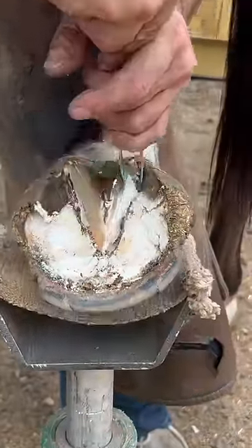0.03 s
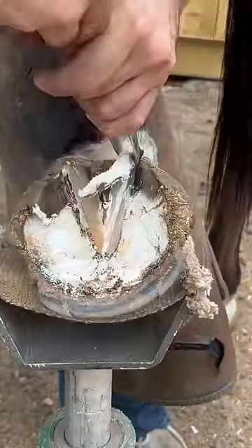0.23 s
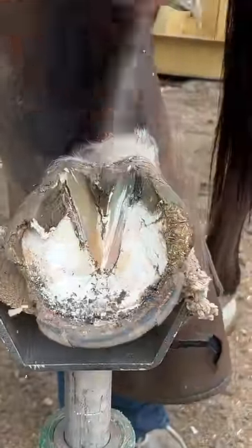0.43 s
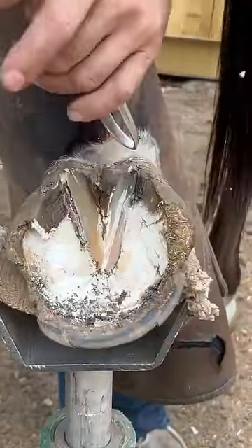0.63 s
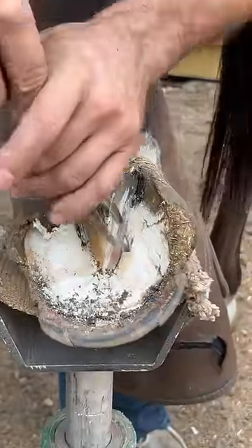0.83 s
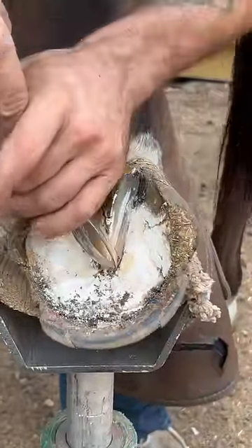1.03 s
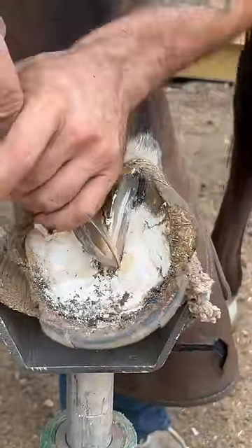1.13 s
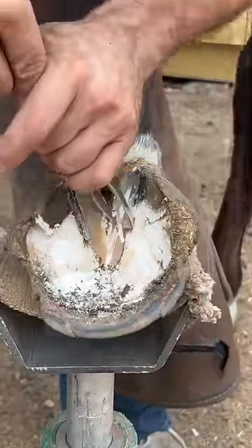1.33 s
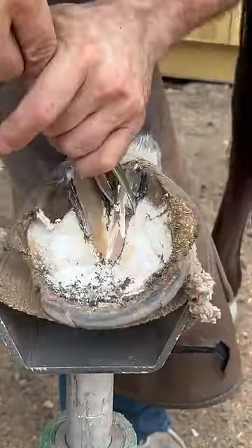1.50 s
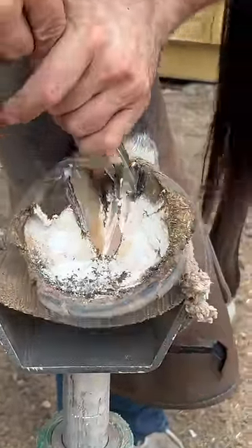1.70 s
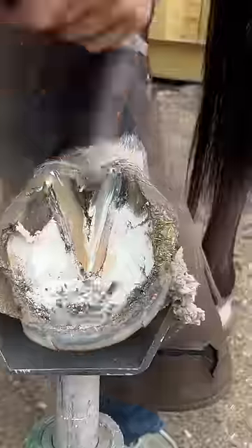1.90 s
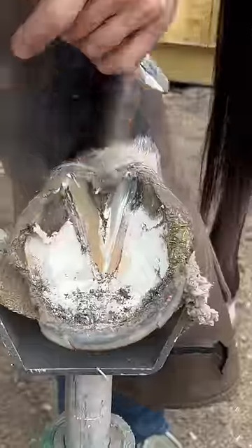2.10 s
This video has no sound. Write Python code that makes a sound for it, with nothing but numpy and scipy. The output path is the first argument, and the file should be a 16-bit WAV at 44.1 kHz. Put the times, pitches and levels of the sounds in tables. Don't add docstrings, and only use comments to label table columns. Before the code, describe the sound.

Hoof trimming up close: blade snaps through horn twice, with light scraping between over quiet outdoor hiss

```python
import sys
import numpy as np
from scipy import signal
from scipy.fft import rfft, irfft, next_fast_len
from scipy.io import wavfile
from scipy.ndimage import uniform_filter1d, map_coordinates

SR = 44100
rng = np.random.default_rng(int(sys.argv[2]) if len(sys.argv) > 2 else 0)


def voltage_ratio(level):
    return 10 ** (np.asarray(level, float) / 20)


def master_out(mix):
    frames = np.transpose(np.atleast_2d(mix))
    ceiling = np.clip(frames, -1, 1)
    pcm = np.round(ceiling * 32767).astype(np.int16)
    wavfile.write(sys.argv[1], SR, pcm)


N = 94815


def unit(x):
    return x / np.sqrt(np.mean(x ** 2) + 1e-20)


def along(points, hz):
    point_hz, value = np.transpose(points)
    return np.interp(np.log(hz + 1), np.log(point_hz + 1), value)


def wobble(rate_hz):
    values = rng.standard_normal(int(N * rate_hz / SR) + 4)
    return map_coordinates(values, [np.arange(N) * rate_hz / SR])


def filtered(x, response):
    size = next_fast_len(N + SR // 2)
    return irfft(rfft(x, size) * response(np.fft.rfftfreq(size, 1 / SR)), size)[..., :N]


def body(peaks):
    def response(f):
        total = 0
        for k, (hz, width_hz, level_db) in enumerate(peaks):
            damping = 1j * f * width_hz
            total = total + (-1) ** k * voltage_ratio(level_db) * damping / (hz * hz - f * f + damping)
        return total
    return response


# hz, likeness (1 = identical channels)
COHERENCE = [(60, 0.89), (240, 0.84), (950, 0.98), (3770, 0.019), (15000, 0.1)]


def rush(spectrum, patchy_db):
    z = signal.stft(rng.standard_normal((2, N)), nperseg=512)[2]
    patches = uniform_filter1d(rng.standard_normal(z.shape[1:]), 6, 0)
    patches = uniform_filter1d(patches, 10, 1)
    pair = signal.istft(z * voltage_ratio(patchy_db * unit(patches)), nperseg=512)[1][:, :N]

    def mid_side(hz):
        angle = np.arccos(np.clip(along(COHERENCE, hz), -1, 1)) / 2
        return voltage_ratio(along(spectrum, hz)) * [np.cos(angle), np.sin(angle)]

    mid, side = filtered(pair, mid_side)
    return unit(np.array([mid + side, mid - side]))


# hz, level_db, t60_s
BLADE_MODES = [(2900, -13.5, 0.019), (3436, 4.5, 0.013), (3545, -22, 0.029), (8300, -18.5, 0.013)]


def blade_ring(level_db, t):
    rise_s = .00075
    swell = (1 - np.exp(-t / rise_s)) ** 3 * 1.8
    ring = np.zeros((2, len(t)))
    for hz, mode_db, t60_s in BLADE_MODES:
        phase = 2 * np.pi * hz * t + rng.uniform(0, 7.1) + np.array([[.6], [-.6]])
        ring += voltage_ratio(level_db + mode_db - 60 * t / t60_s) * swell * np.sin(phase)
    return ring


# start_s, peak_db, crack_t60_s, ring_over_crack_db, treble_over_crack_db
SNAPS = [
    (.2461, -17, 0.03, 3.5, 7.5),
    (1.8394, -22, 0.01295, -16, 8),
    (1.8410, -29.5, 0.021, -11.5, 13),
    (1.8497, -40, .012, -16, 17),
]
# hz, width_hz, level_db
CHIP_MODES = [(250, 57, -7.5), (420, 80, -1), (626, 84, 7.5), (930, 270, 4), (1530, 220, 2.5),
              (2128, 410, -5), (4850, 1500, -2.5)]
# hz, width_hz, level_db
SLAB_MODES = [(227.2, 83, 9), (436, 122, 2.5), (600, 164, 2), (990, 340, -2.5), (1620, 660, -7.5),
              (2330, 370, -3), (3190, 560, -2), (4670, 970, -8)]
# hz, width_hz, level_db
CHIP_EDGE_MODES = [(6210, 1200, -7), (8300, 890, 4), (8850, 540, 2), (12000, 450, -5.5), (14860, 1300, -7)]
# hz, width_hz, level_db
SLAB_EDGE_MODES = [(5880, 330, 3), (7830, 820, -3.5), (9600, 1100, -5), (12000, 1160, 3.5),
                   (14600, 2200, 2)]
# hz, width_hz, level_db
SPLINTER_MODES = [(7400, 1500, -5), (12000, 1300, 2.5), (15500, 700, 2.5)]
# hz, left_lead_rad
EDGE_PHASE = [(4000, 2.9), (8000, 1.3), (13000, 2.9)]


def snaps():
    tear_s, rise_s, edge_t60_s = .0015, .0003, .006
    fibre_s, fibre_share = .0007, .35
    fray_db, blow_db, nick_db = -3, 25.5, 7.5
    horn_drive, ring = np.zeros((2, N + SR)), np.zeros((2, N + SR))
    edge_drive = np.zeros((3, 2, N + SR))
    t = np.arange(SR // 4) / SR
    for k, (start_s, peak_db, t60_s, ring_db, treble_db) in enumerate(SNAPS):
        i = round(start_s * SR)
        span = slice(i, i + len(t))
        noise = rng.standard_normal((3, len(t)))
        tear = voltage_ratio(-60 * np.maximum(t - tear_s, 0) / t60_s) * (1 - np.exp(-t / rise_s))
        horn = horn_drive[min(k, 1)]
        horn[span] += voltage_ratio(peak_db + fray_db) * tear * noise[0]
        horn[[i + 9, i + round(fibre_s * SR)]] += voltage_ratio(peak_db + blow_db) * np.array([1, fibre_share])
        burst = voltage_ratio(-60 * np.abs(t - rise_s) / edge_t60_s) + .1 * tear
        edge = edge_drive[(0, 1, 1, 2)[k]]
        edge[:, span] += voltage_ratio(peak_db + treble_db) * burst * (0.9 * noise[1] + 0.2 * noise[[0, 2]])
        edge[:, i + round(rise_s * SR)] += voltage_ratio(peak_db + treble_db + nick_db)
        ring[:, span] += blade_ring(peak_db + ring_db, t)
    horn = filtered(horn_drive[0, :N], body(CHIP_MODES)) + filtered(horn_drive[1, :N], body(SLAB_MODES))
    left_late_s = .00006
    horn = filtered(horn, lambda f: np.exp(-2j * np.pi * f * np.array([[left_late_s], [0]])))
    edge_modes = (CHIP_EDGE_MODES, SLAB_EDGE_MODES, SPLINTER_MODES)
    edge = sum(filtered(drive[:, :N], body(modes)) for drive, modes in zip(edge_drive, edge_modes))
    edge = filtered(edge, lambda f: np.exp(.5j * along(EDGE_PHASE, f) * np.array([[1], [-1]])))
    pan_db = 2
    return (horn + ring[:, :N]) * voltage_ratio([[pan_db], [-pan_db]]) + edge


# start_s, length_s, level_db, brightness_db
STROKES = [(-.12, 0.36, -64, -10.5), (0.055, 0.27, -80, 4), (0.156, 0.1, -65.5, -12),
           (1.136, 0.058, -67, -10), (1.256, 0.059, -58, 0), (1.296, 0.057, -69, -8.5),
           (1.401, 0.23, -71.5, -12.5), (1.549, .24, -68, -6.5), (1.747, 0.077, -64, -1.5),
           (1.805, 0.083, -64.5, -14), (0.509, 0.23, -73.5, -18), (1.157, 0.12, -74.5, -10.5)]
# start_s, level_db, t60_s, brightness_db
CRUMBS = [
    (.252, -57, .36, -3.5),
    (1.845, -53, 0.271, -7),
]
# hz, density_db (per Hz)
DULL_RUB = [(180, -31.5), (300, -1), (1620, -5), (2340, -3), (4650, -7.5), (5820, -16), (7000, -17.5),
            (9100, -47.5), (15400, -120)]
# hz, density_db (per Hz)
BRIGHT_RUB = [(4000, -31.5), (5500, -15.5), (8500, -0.5), (12300, -11), (14000, -4.5), (16000, -12.5),
              (17000, -14.5)]


def scrapes():
    t = np.arange(N) / SR
    start_s, length_s, level_db, stroke_bright_db = np.transpose(STROKES)[..., None]
    strokes = voltage_ratio(level_db) * np.sin(np.pi * np.clip((t - start_s) / length_s, 0, 1)) ** 2
    start_s, level_db, t60_s, dust_bright_db = np.transpose(CRUMBS)[..., None]
    dust = (t > start_s) * voltage_ratio(level_db - 60 * np.abs(t - start_s) / t60_s)
    envelopes = np.vstack([strokes, dust])
    bright_db = np.vstack([stroke_bright_db, dust_bright_db])

    grains_per_s, grain_spread_db, grain_share, wobble_db = 5700, 4.5, 0.29, 1.5
    struck = rng.random((2, N)) < grains_per_s / SR
    size = voltage_ratio(grain_spread_db * np.minimum(rng.standard_exponential(N), 3))
    grains = struck * size * rng.standard_normal((2, N))
    rub = grain_share * unit(grains) + (1 - grain_share) * rng.standard_normal((2, N))
    rub = rub * voltage_ratio(wobble_db * wobble(120))
    rub = rub + 0.2 * rub[::-1]

    def coloured(spectrum):
        return unit(filtered(rub, lambda f: voltage_ratio(along([(100, -45.5)] + spectrum, f))))

    dull = coloured(DULL_RUB) * envelopes.sum(0)
    bright = coloured(BRIGHT_RUB) * (envelopes * voltage_ratio(bright_db)).sum(0)
    return (dull + bright) * voltage_ratio([[1.2], [-1.2]])


# from_hz, to_hz, level_db, width_hz
SQUEAKS = [
    (13860, 11908, -70, 250),
    (2850, 2600, -66.5, 700),
    (12200, 7500, -74, 220),
]
# start_s, end_s
SQUEAK_SPAN = (-.01, .135)


def squeaks():
    start_s, end_s = SQUEAK_SPAN
    progress = np.clip((np.arange(N) / SR - start_s) / (end_s - start_s), 0, 1)
    out = np.zeros(N)
    for from_hz, to_hz, level_db, width_hz in SQUEAKS:
        phase = 2 * np.pi * np.cumsum(from_hz + (to_hz - from_hz) * progress) / SR
        out += voltage_ratio(level_db) * np.sin(np.pi * progress) * wobble(width_hz) * np.sin(phase)
    return out * voltage_ratio([[1.2], [-1.2]])


# start_s, peak_db, pitch_hz, t60_s, crack_over_tone_db
TICKS = [(0.075, -64, 8700, 0.036, 11), (.094, -54.5, 8300, 0.012, 2.5), (0.1809, -42.5, 3740, 0.0045, -3),
         (0.1823, -49, 8600, 0.0067, -13), (0.195, -47.5, 8000, 0.021, -4), (0.1976, -47.5, 1580, 0.011, 5),
         (0.437, -63, 1500, 0.023, -28.5), (0.542, -51, 721, 0.027, -33.5), (.571, -54, 725, 0.021, -20),
         (0.599, -56.5, 1700, 0.0098, -27.5), (0.6, -52.5, 325.6, 0.035, -30), (0.617, -50, 710, 0.02, -30),
         (.657, -50.5, 685, 0.016, -20.5), (0.713, -50.5, 820, 0.017, -6), (0.713, -62, 2500, 0.015, -17),
         (.723, -54.5, 747, 0.027, -26.5), (.74, -71, 12000, 0.0049, 13), (0.443, -54, 600, 0.017, -28.5),
         (0.889, -54, 1010, 0.02, -16), (0.911, -47.5, 714, 0.019, -27.5),
         (1.1469, -28.5, 1600, 0.0033, -36.5), (1.147, -46.5, 1105, 0.016, -23),
         (1.147, -56, 12000, 0.01, -22.5), (1.1468, -44, 2370, 0.0094, -25.5),
         (1.433, -58, 1496, .008, -19), (1.844, -46, 1903, 0.052, -30), (.257, -51, 3710, 0.13, -41),
         (.318, -66, 3426, 0.2, -40.5), (0.2396, -55, 3015, 0.015, 13.5), (1.156, -59, 3644, 0.05, -7),
         (1.481, -40, 2330, 0.0021, -13.5), (1.776, -58, 5190, .006, 2), (1.7875, -50, 690, 0.023, 8.5)]


def ticks():
    rise_cycles, roughness, roughest_hz = 0.45, .9, 5200
    overtone_level, overtone_ratio = .55, 1.45
    out, t = np.zeros((2, N + SR)), np.arange(SR // 4) / SR
    for start_s, peak_db, hz, t60_s, crack_db in TICKS:
        noise = rng.standard_normal((3, len(t)))
        jitter = roughness * min(hz, roughest_hz) / SR * 2 * np.cumsum(noise[2])
        phase = 2 * np.pi * hz * t + jitter
        decay = voltage_ratio(-60 * t / t60_s)
        overtone = overtone_level * np.sin(overtone_ratio * phase) * decay
        tone = (np.sin(phase) + overtone) * decay
        crack = voltage_ratio(crack_db - 60 * t / min(t60_s, .014)) * noise[:2]
        rise = 1 - np.exp(-(t * hz / rise_cycles) ** 2)
        i = round(start_s * SR)
        out[:, i:i + len(t)] += voltage_ratio(peak_db + 0.5) * rise * (crack - tone)
    return out[:, :N] * voltage_ratio([[1.3], [-1.3]])


# hz, t60_s
SHELTER_DECAY = [(200, 0.93), (1500, .3), (3500, 0.43), (8000, 0.32), (15000, 0.38)]
# hz, gain_db
WALL_GAIN = [(2900, 0.5), (3450, -9.5), (4000, -2.5)]


def shelter(knife):
    wall_s, level_db = .005, -22
    returned = filtered(knife, lambda f: voltage_ratio(along(WALL_GAIN, f)))
    hz, t, z = signal.stft(rng.standard_normal((2, SR // 2)), SR, nperseg=256)
    decay = voltage_ratio(-60 * t / along(SHELTER_DECAY, hz)[:, None])
    tail = signal.istft(z * decay, SR, nperseg=256)[1]
    tail = tail / np.linalg.norm(tail[0])
    late = np.pad(returned, ((0, 0), (round(wall_s * SR), 0)))
    return voltage_ratio(level_db) * signal.fftconvolve(late, tail, axes=1)[:, :N]


# trough_s, peak_db, pitch_hz
JOLTS = [(0.221, -49.5, 106.6), (.35, -53, 85), (0.396, -56, 103.2), (.438, -57, 104), (.483, -56.5, 60.8),
         (.609, -57.5, 68.4), (0.645, -56, 130), (0.955, -56, 109), (1.09, -57, 66), (1.173, -54, 165.8),
         (1.618, -52.5, 62.2), (1.672, -50.5, 91.2), (1.758, -53.5, 99), (0.2701, -19.5, 106.2),
         (0.2573, -38.5, 210), (0.307, -40.5, 89.2), (0.8953, -50.5, 211), (.911, -34.5, 134.4),
         (1.468, -49, 116.7), (1.811, -35, 107), (1.8638, -20.5, 100.6), (1.898, -44, 110),
         (1.928, -44, 56.7), (1.977, -38.5, 55.9), (2.035, -45, 52.2), (2.081, -46.5, 94.4),
         (2.128, -46.5, 57.4)]


def jolts():
    swell_cycles, fade_cycles, sag = .85, .8, .16
    left_late_s, pan_db = .00015, -.3
    trough_s, peak_db, hz = np.transpose(JOLTS)[..., None, None]
    cycles = (np.arange(N) / SR - trough_s - left_late_s * np.array([[1], [0]])) * hz
    shape = np.exp(-.5 * (cycles / np.where(cycles < 0, swell_cycles, fade_cycles)) ** 2)
    wave = np.cos(2 * np.pi * (cycles - .5 * sag * cycles ** 2))
    return -(voltage_ratio(peak_db) * shape * wave).sum(0) * voltage_ratio([[pan_db], [-pan_db]])


# hz, density_db (per Hz)
RUMBLE = [(12, -65), (20, -28.5), (54, 6), (91, -2), (125, 0.5), (156, -3), (400, -19), (520, -19),
          (880, -120)]
# time_s, level_db
HAND_LOAD = [(0.0, -62.5), (.17, -60.5), (.33, -57.5), (.45, -58.5), (.52, -64.5), (.63, -59), (.75, -63),
             (.86, -64.5), (.96, -59.5), (1.12, -68), (1.19, -58.5), (1.33, -61.5), (1.4, -67),
             (1.55, -61.5), (1.659, -60.5), (1.72, -63.5), (1.77, -59), (2.15, -63.5)]
# hz, density_db (per Hz)
YARD = [(150, -31), (250, -13), (342, -8.5), (769, -15.5), (1970, -15), (3060, -20), (3580, -11.5),
        (5180, -5), (7500, -24), (9750, -46.5), (16500, -120)]
# hz, density_db (per Hz)
AIR = [(5500, -25.5), (7000, -2), (9300, -6.5), (12000, -5), (13000, -2), (13500, -31.5), (17000, -53.5)]


def yard():
    lump_db, yard_db, air_db = 1.2, -67.5, -89
    time_s, level_db = np.transpose(HAND_LOAD)
    load_db = np.interp(np.arange(N) / SR, time_s, level_db) + lump_db * wobble(16.0)
    rumble = voltage_ratio(load_db) * rush(RUMBLE, patchy_db=3.0)
    air = voltage_ratio(air_db) * rush(AIR, patchy_db=4.0)
    hiss = voltage_ratio(yard_db - 4.0 + 0.52 * wobble(4)) * rush(YARD, patchy_db=0.0)
    return rumble + air + hiss


def scene():
    knife = snaps() + ticks() + scrapes() + squeaks()
    return knife + shelter(knife) + jolts() + yard()


def roll_off(x):
    return signal.sosfilt(signal.butter(12, 17130, fs=SR, output="sos"), x)


# low_hz, high_hz
GATED_BANDS = [(9700, 11000), (13400, 14400), (16100, 17500)]


def record(dry):
    top_hz, slope_hz, opens_db, open_s = 16700, 60, -48, .004

    def above(f, edge_hz):
        return .5 + .5 * np.tanh((f - edge_hz) / slope_hz)

    full = filtered(dry, lambda f: 1 - above(f, top_hz))
    gated = filtered(full, lambda f: sum(above(f, low) - above(f, high) for low, high in GATED_BANDS))
    power = np.abs(uniform_filter1d((gated ** 2).mean(0), size=round(open_s * SR))) / voltage_ratio(2 * opens_db)
    mix = full - gated / (1 + power ** 2)
    return roll_off(mix)


dry = scene()
out = record(dry)
master_out(out)
```